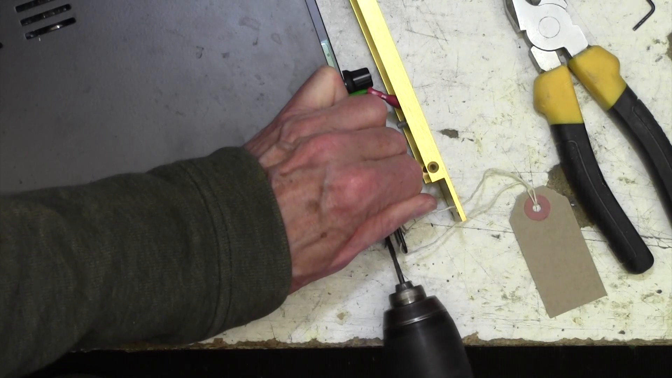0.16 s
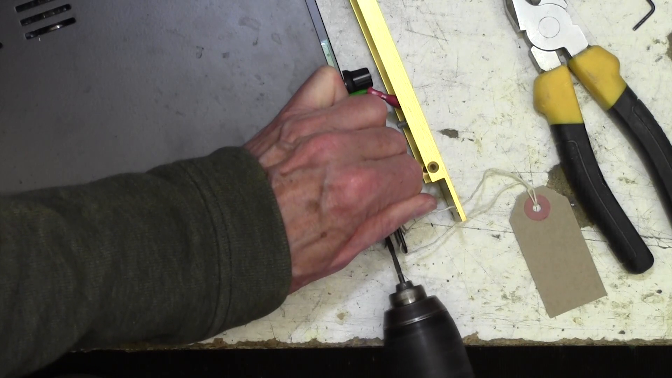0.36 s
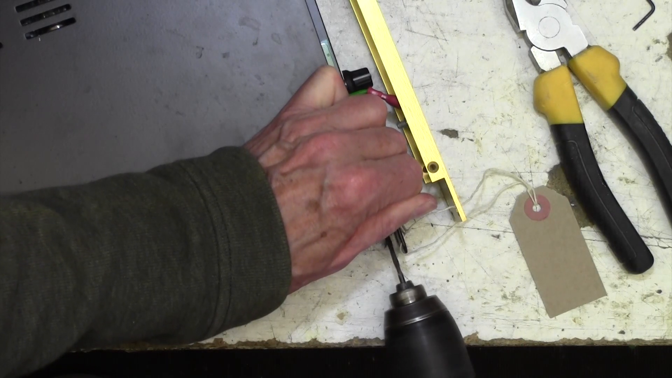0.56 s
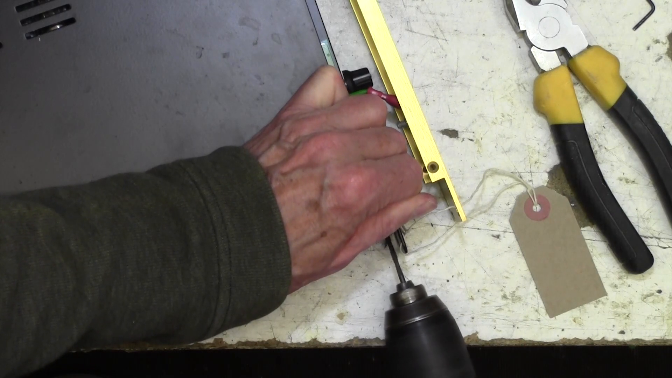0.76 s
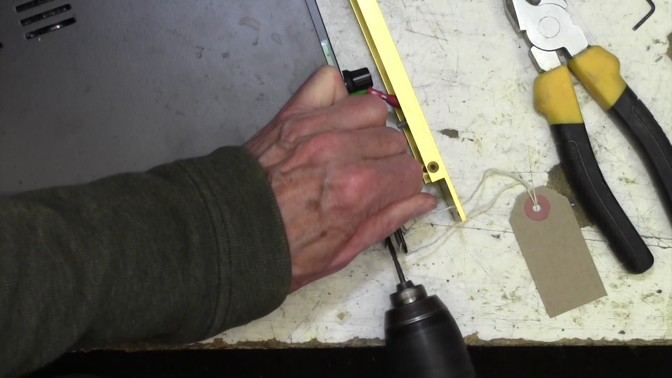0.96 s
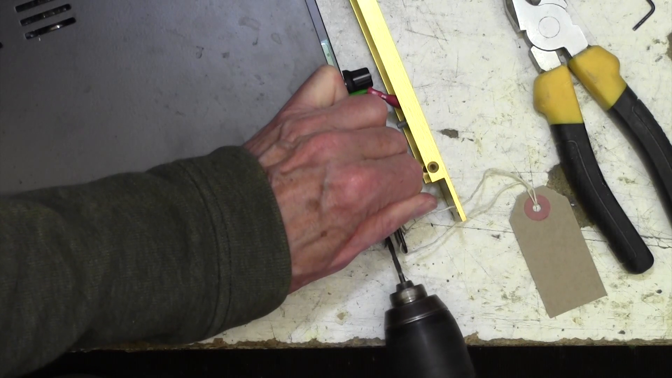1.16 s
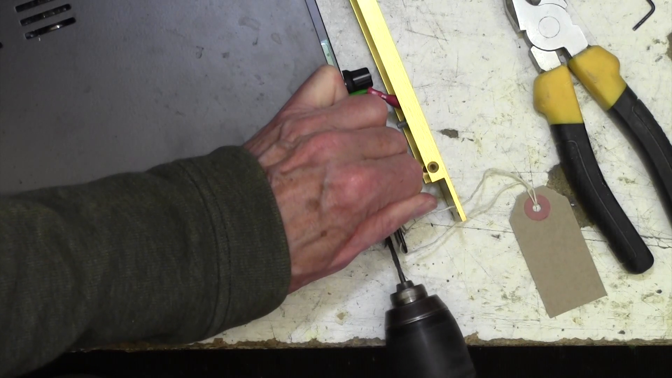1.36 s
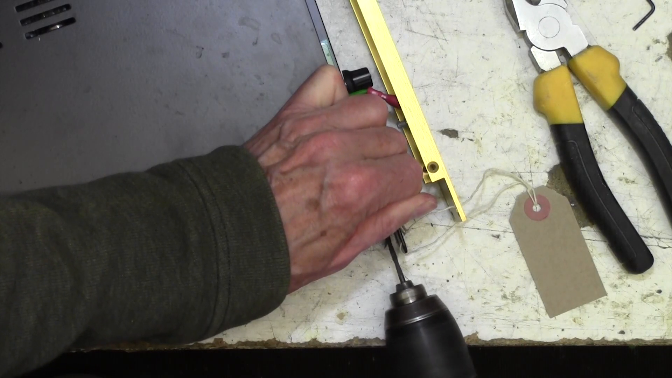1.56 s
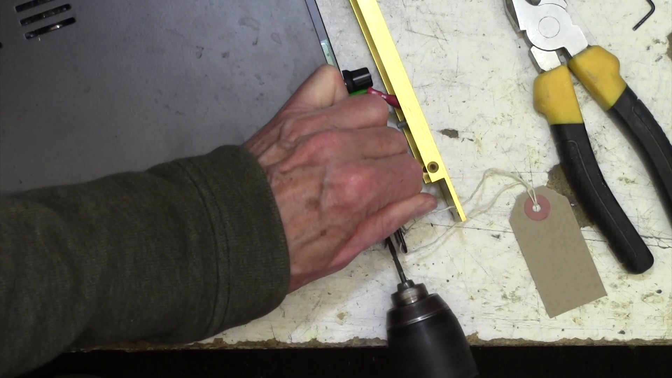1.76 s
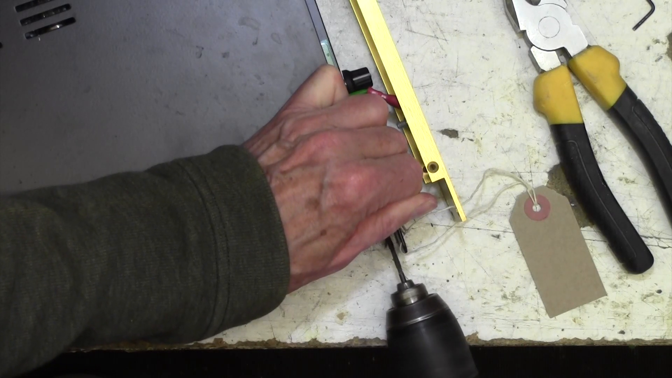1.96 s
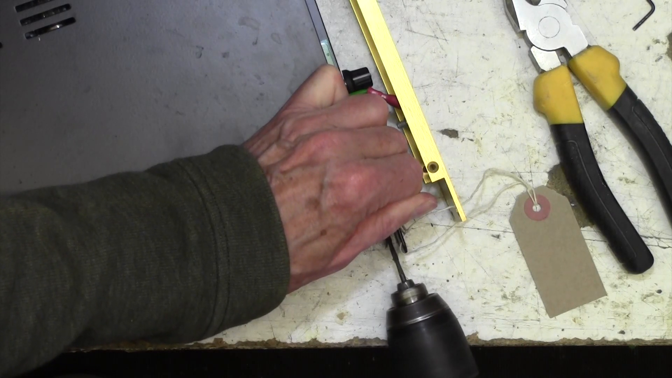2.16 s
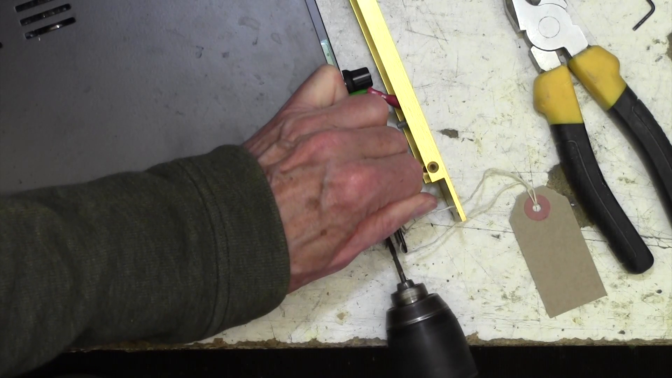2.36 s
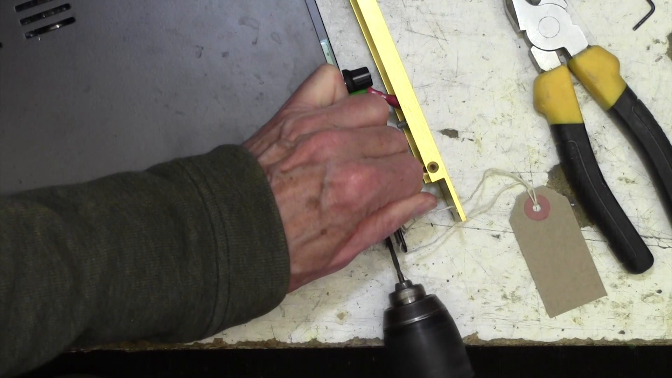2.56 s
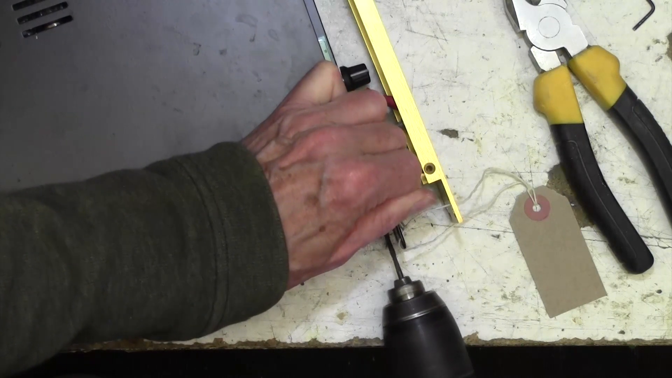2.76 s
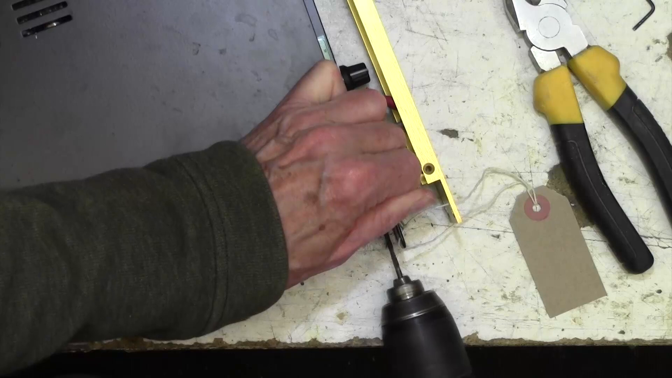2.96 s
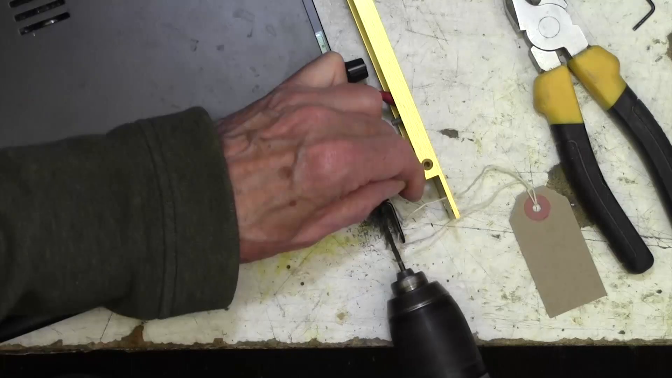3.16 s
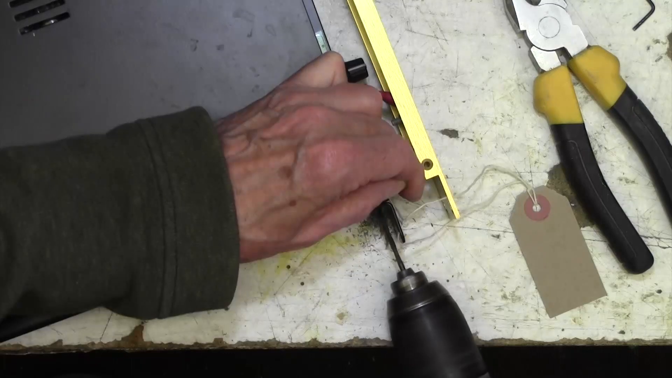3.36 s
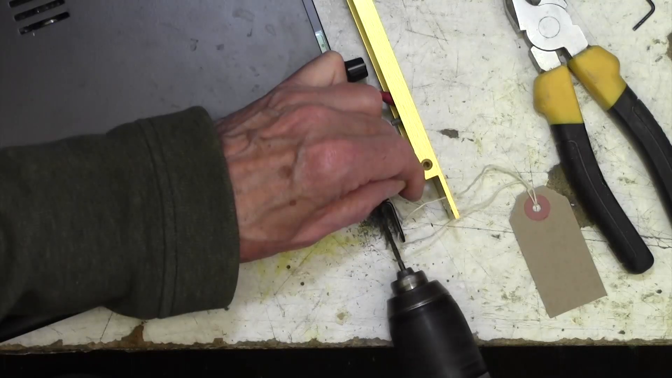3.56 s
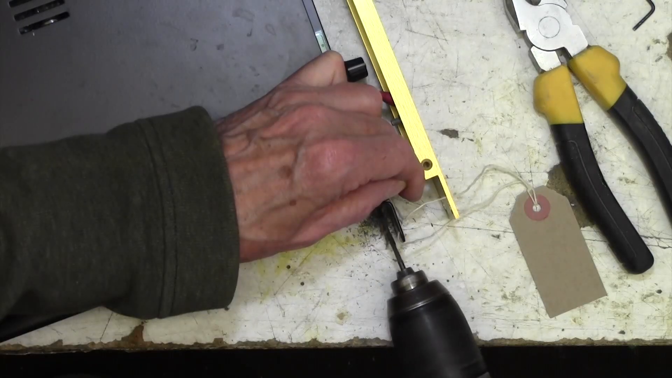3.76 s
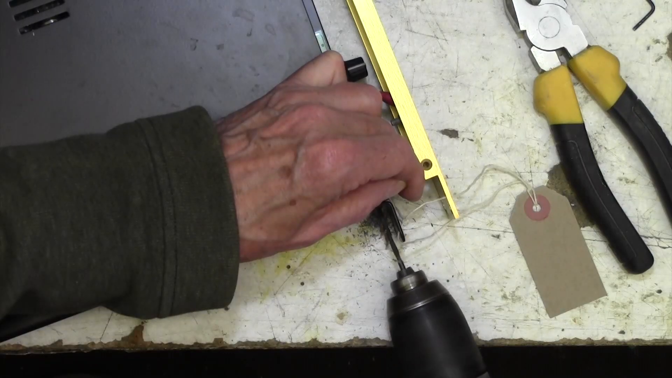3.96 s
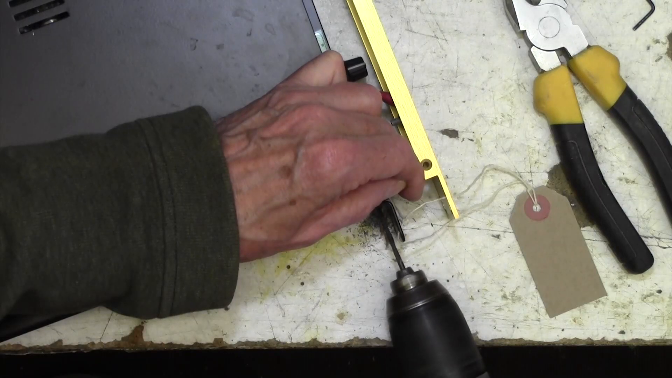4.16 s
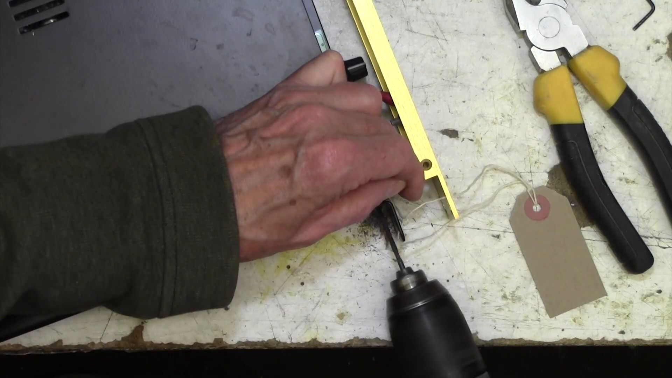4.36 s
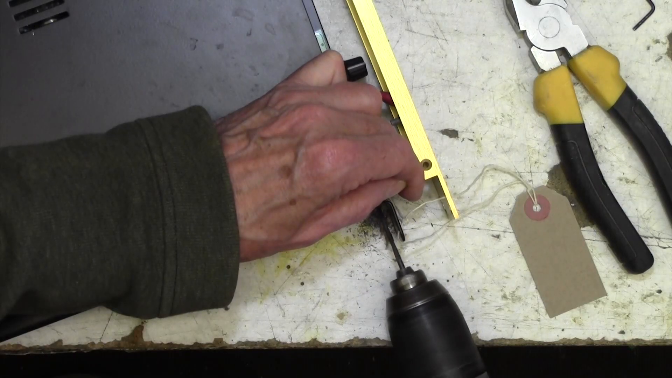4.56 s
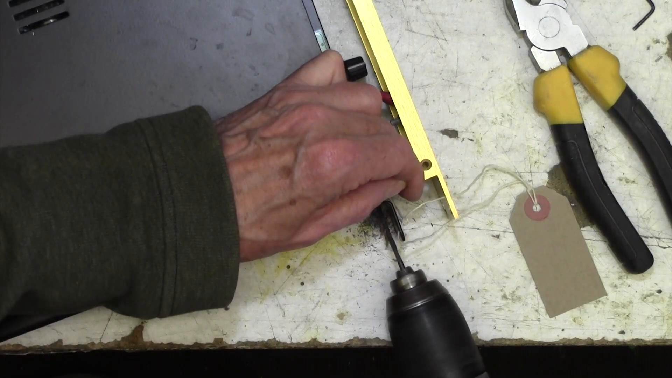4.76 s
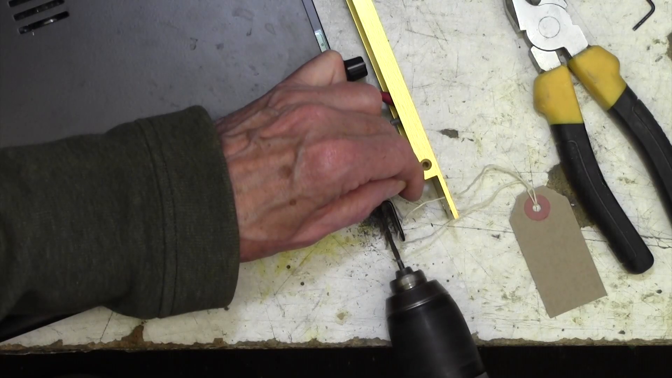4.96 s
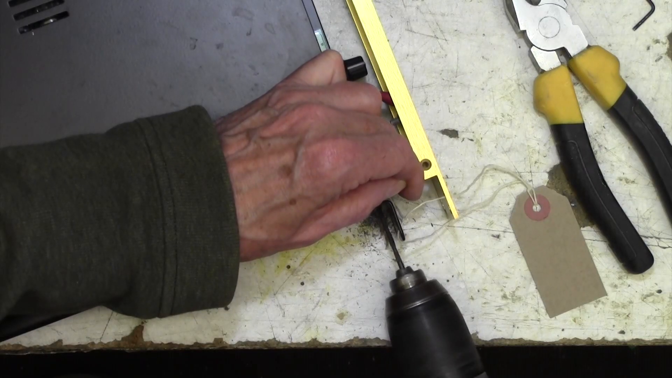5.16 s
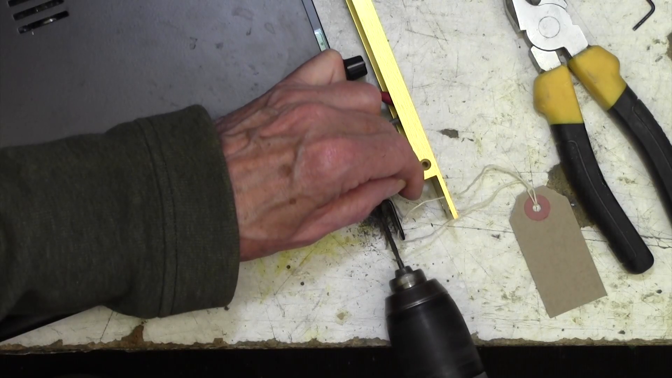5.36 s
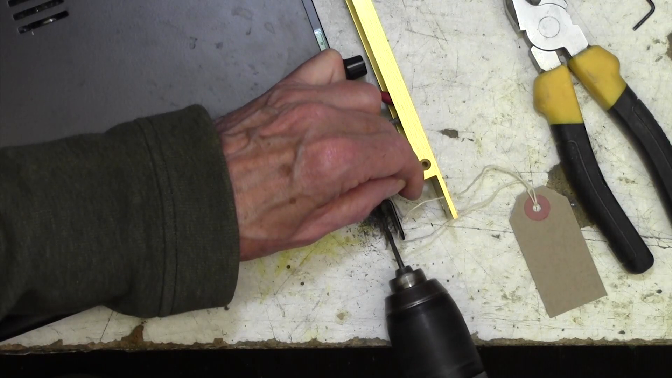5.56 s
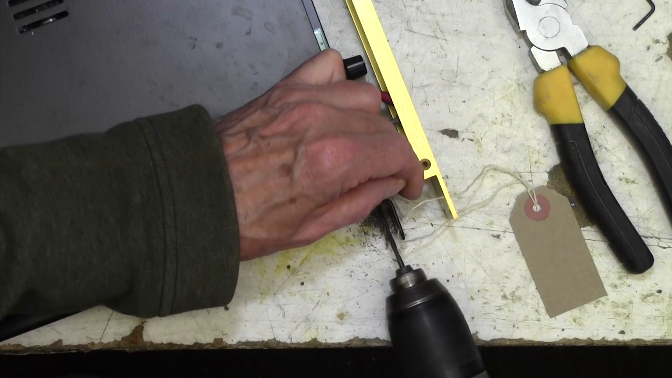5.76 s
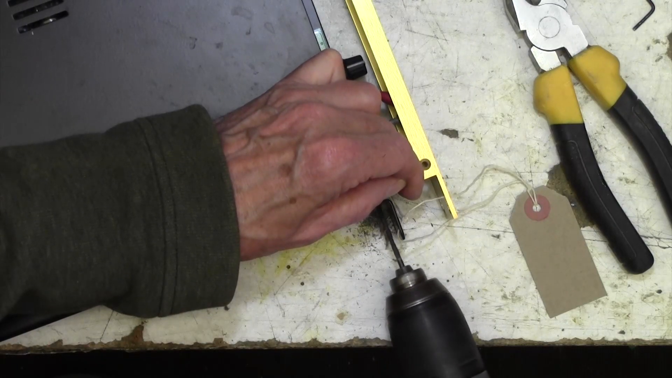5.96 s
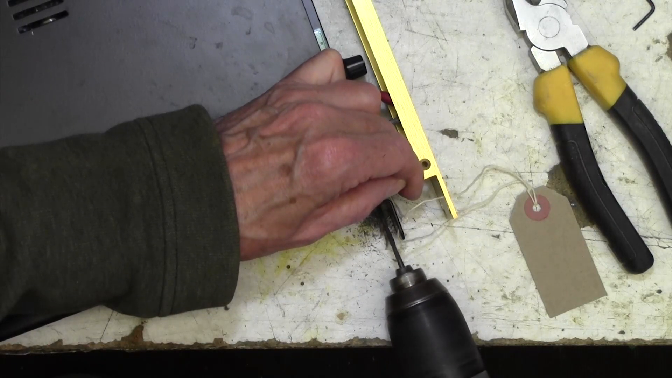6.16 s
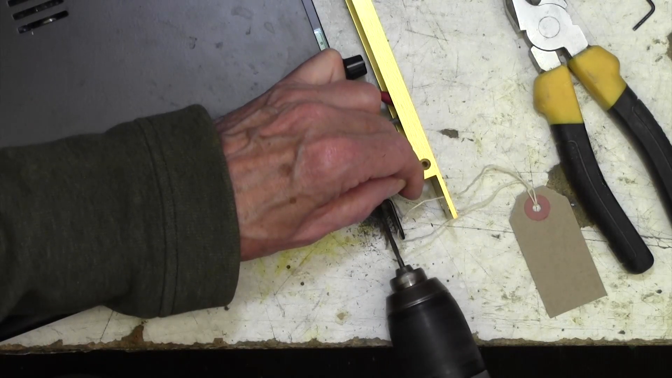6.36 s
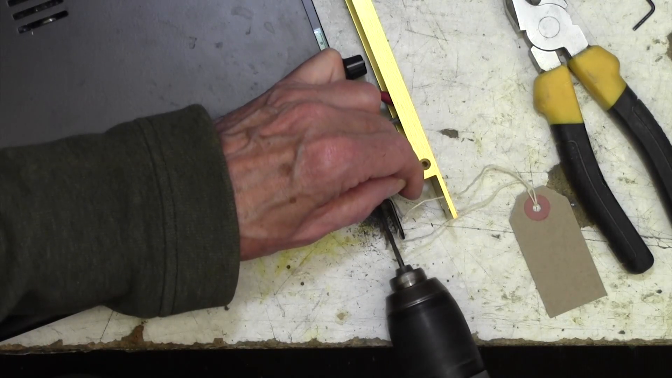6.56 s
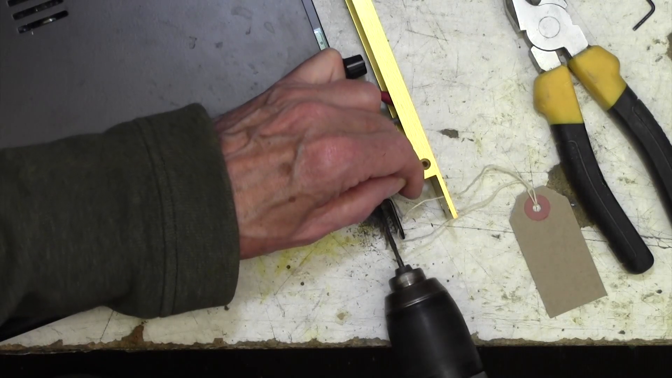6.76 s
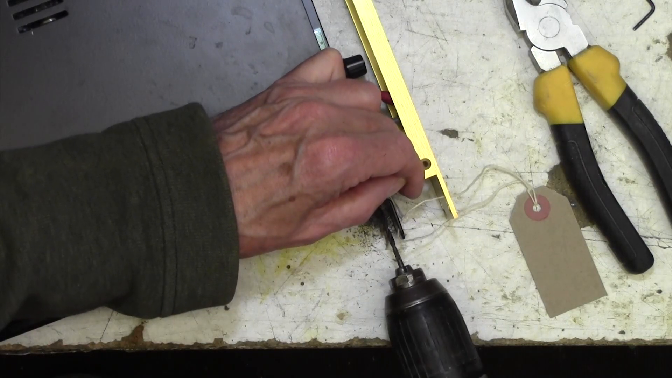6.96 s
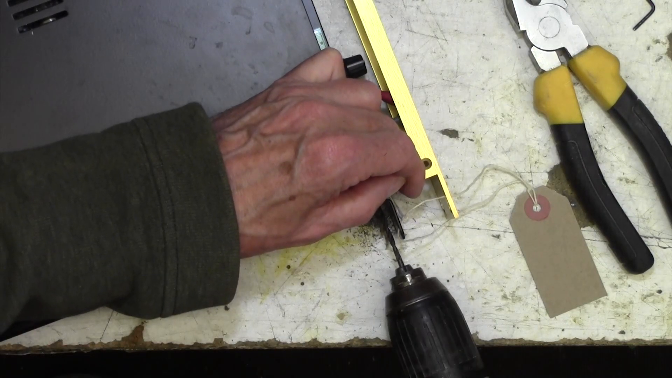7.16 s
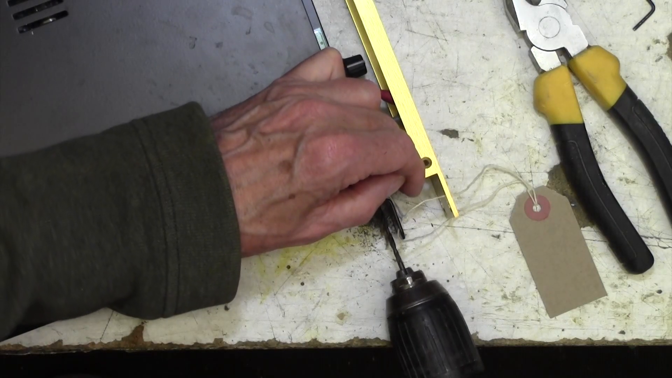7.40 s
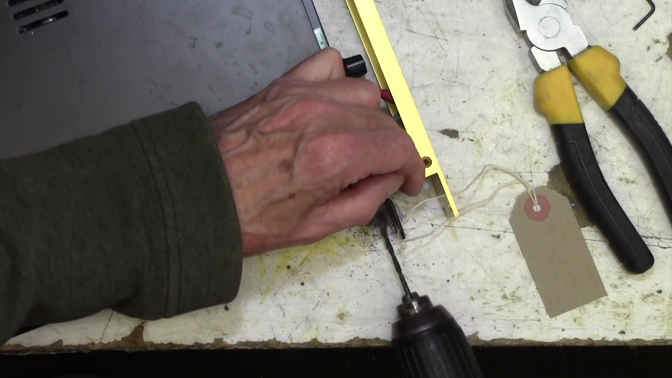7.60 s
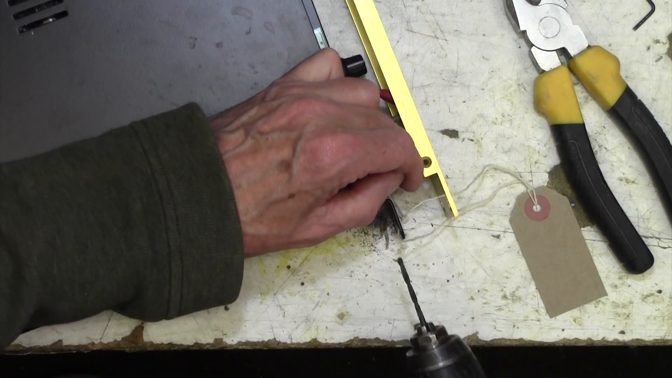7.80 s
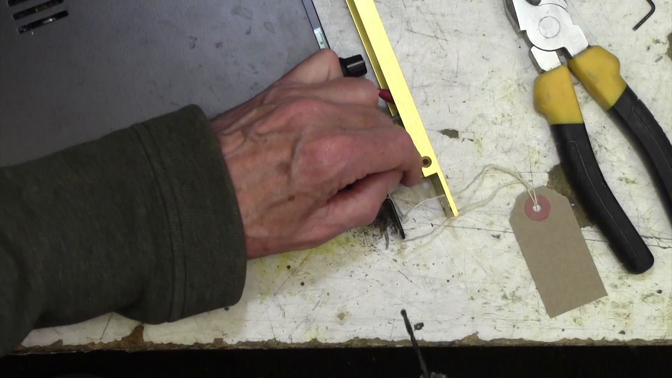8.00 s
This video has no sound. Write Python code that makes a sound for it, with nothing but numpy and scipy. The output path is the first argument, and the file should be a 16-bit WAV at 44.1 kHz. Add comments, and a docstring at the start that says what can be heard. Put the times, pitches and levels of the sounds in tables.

```python
"""At a workbench, a cordless drill bores out a stripped screw. The motor hums and its planetary gearbox whines and
rattles: tones locked to the turning carrier, over noise coloured by the casing. The bit squeals thinly (a climbing
tone), chatters in the metal for half a second (jumps that ring a panel) and is pushed harder, so the motor slows.
The trigger is let go, the brake stops the chuck with a ringing clack, and the bit is drawn out, touching and
brushing (decaying and sliding noise through resonances), over faint air noise and a mains hum."""
import sys
import numpy as np
from scipy import signal
from scipy.fft import rfft, irfft, next_fast_len
from scipy.io import wavfile

SR = 44100
rng = np.random.default_rng(int(sys.argv[2]) if len(sys.argv) > 2 else 0)


def wrap_up_sound(samples):
    """Save the sound to the file named by the first command line argument, as 16-bit audio."""
    columns = np.atleast_2d(samples).T
    # keep every value between -1 and 1, then stretch to whole-number steps
    tamed = np.clip(columns, -1, 1)
    steps = np.round(tamed * 32767).astype(np.int16)
    wavfile.write(sys.argv[1], SR, steps)


N = 354123
TIME = np.arange(N) / SR
FFT_SIZE = next_fast_len(N + 8192)
BINS_HZ = np.maximum(np.arange(FFT_SIZE // 2 + 1) * SR / FFT_SIZE, 1)
GEAR_RATIO = 7   # rotor turns per carrier turn


def from_db(db):
    """Gain of a level in dB."""
    return 10 ** (np.asarray(db) / 20)


def rms_one(x):
    """Scale to rms 1."""
    return x / np.sqrt(np.mean(x ** 2) + 1e-20)


def in_time(rows):
    """Each column of a curve at every sample."""
    s, *columns = np.transpose(rows)
    return [np.interp(TIME, s, c) for c in columns]


def in_frequency(rows):
    """Each dB column of a spectrum as a gain at every bin, interpolated over log frequency."""
    hz, *columns = np.transpose(rows)
    return [from_db(np.interp(np.log(BINS_HZ), np.log(hz), c)) for c in columns]


def colour(x, gains):
    """Filter a steady sound by a gain per bin."""
    return irfft(rfft(x, FFT_SIZE) * gains, FFT_SIZE)[..., :N]


def drift(rate_hz, size=2048):
    """Slow random curve of rms 1, changing about rate_hz times a second."""
    hz = np.arange(size + 1) * SR / N
    slow = irfft(rfft(rng.standard_normal(2 * size)) / (1 + (hz / rate_hz) ** 2))
    return np.interp(TIME, np.linspace(0, N / SR, 2 * size), rms_one(slow))


def resonate(x, modes):
    """Parallel two-pole resonances of alternating sign."""
    out = 0
    for k, (hz, width_hz, db) in enumerate(modes):
        r = np.exp(-np.pi * width_hz / SR)
        zeros = np.array([1, 0, -1]) * (1 - r * r) / 2
        poles = [1, -2 * r * np.cos(2 * np.pi * hz / SR), r * r]
        out = out + (-1) ** k * from_db(db) * signal.lfilter(zeros, poles, x + 1e-18)
    return out


def swell(start_s, length_s, attack_s, t60_s):
    """Linear attack, hold and exponential release; height 1."""
    attack = np.clip((TIME - start_s) / attack_s, 0, 1)
    return attack * from_db(-60 * np.clip((TIME - start_s - length_s) / t60_s, 0, 3))


def at_load(load, levels):
    """Blend the values for light, medium and heavy load."""
    return np.interp(load, np.arange(len(levels)), levels)


def latest(events):
    """Each column of the event that began last, at every sample."""
    rows = np.array(events)
    return rows[np.maximum(np.searchsorted(rows[:, 0], TIME, side="right") - 1, 0)].T


def gear_rattle(angle, load, repeating, knock_db, grain_db, split_hz, trim_db):
    """Teeth rub and knock, partly alike on each turn, partly at random, and sound through the casing."""
    # Each row: level in dB before trim, treble in dB relative to it; rows for light, medium, heavy load.
    rattle = [(-19.5, 1.3), (-18.5, 0), (-18, -2)]
    # Carrier multiples at which the teeth knock.
    knock_orders = [7, 13, 14, 20, 27, 34]
    level_db, treble_db = (at_load(load, column) for column in np.transpose(rattle))
    strain = (load / 2) ** 2
    seat = np.pi / 2 * strain + 0.3 * drift(0.32)   # other flanks touch as the load shifts
    pattern = np.cos(seat) * tooth_pattern(angle) + np.sin(seat) * tooth_pattern(angle)
    share = np.clip(repeating, 0, 1)
    rub = np.sqrt(share) * pattern + np.sqrt(1 - share) * rng.standard_normal(N)
    knocks = rms_one(sum(np.cos(k * angle + rng.uniform(0, 2 * np.pi)) for k in knock_orders))
    force = rub * from_db(knock_db * knocks + grain_db * drift(53))
    light, heavy = casing()
    low = 1 / (1 + (BINS_HZ / split_hz) ** 16)
    out = 0
    for band, db in ((low, level_db), (1 - low, level_db + treble_db)):
        light_part = (1 - strain) * rms_one(colour(force, light * band))
        heavy_part = strain * rms_one(colour(force, heavy * band))
        out = out + from_db(db + trim_db) * (light_part + heavy_part)
    return out


def tooth_pattern(angle, count=440, size=16384):
    """Flaws of the teeth come round again with every turn of the carrier."""
    flaws = rng.standard_normal((count, 2)) @ [1, 1j]
    one_turn = irfft(flaws, size)
    return rms_one(np.interp(angle / (2 * np.pi) % 1, np.arange(size) / size, one_turn))


def casing():
    """Gains of the casing at light and heavy load: a broad colour with narrow peaks and notches."""
    # Broad colour. Each row: frequency in Hz, dB per Hz at light load, dB per Hz at heavy load.
    broad = [(185, -30, -28), (280, -15, -13), (417, -18.5, -19), (556, -6, -6), (646, -19, -15.5),
             (778, -10.5, -13.5), (1037, -13, -11.5), (2730, -4.5, -3), (4730, -4.5, -1.5),
             (4870, -7.5, -4.5), (6850, -5, -6.5), (9270, -2.5, -5.5), (12180, -9.5, -8.5),
             (13500, -20.5, -20.5)]
    # Peaks and notches. Each row: frequency in Hz, width in Hz, gain in dB.
    narrow = [(1080, 90, -5.5), (1330, 60, -4.5), (1385, 90, 2), (1850, 54, -2.3), (2520, 140, 2.5),
              (2690, 60, 0.5), (2863, 90, 4.5), (3200, 160, -1.2), (3560, 480, -2), (4020, 300, 1.6),
              (4420, 92, -8), (4564, 88, 3.5), (4750, 47, -9.5), (5130, 90, -3), (5860, 77, -7),
              (6400, 60, 1.5), (6840, 90, -3.5), (7010, 90, -4), (7970, 55, 4), (8280, 260, -2.5),
              (9250, 97, 3.5), (9640, 89, 3), (9770, 55, 4), (10660, 300, -3.5)]
    ripple_db = sum(db * np.exp(-2 * ((BINS_HZ - hz) / width_hz) ** 2) for hz, width_hz, db in narrow)
    return [gains * from_db(ripple_db) for gains in in_frequency(broad)]


def gear_tones(angle, load, waver_db, slip_rad):
    """Tooth-mesh tones and their sidebands, all locked to the carrier; each wavers as the planets shift."""
    # Gear and bearing tones. Each row: multiple of the carrier's rate, dB at light, medium and heavy load.
    tones = [(1, -56, -55, -52), (7, -38, -43, -42), (14, -45, -46, -39), (22, -48, -46, -42),
             (48, -42, -49, -48), (52.8, -40, -57, -48), (61, -38, -47, -52), (63.8, -45, -43, -37),
             (66, -50, -55, -36), (68, -48, -33, -47), (75, -34, -36, -31), (81, -39, -35, -37),
             (83.2, -56, -47, -38), (88, -32, -33, -35), (91, -49, -49, -37), (95, -44, -34, -42),
             (102, -47, -53, -44), (108, -46, -49, -40), (109, -39, -51, -36), (112, -46, -54, -40),
             (116, -40, -38, -41), (119, -47, -39, -43), (122, -40, -44, -31), (132, -43, -42, -39),
             (133, -42, -44, -47), (147, -45, -34, -43), (163, -42, -48, -50), (168, -41, -47, -42),
             (176, -36, -34, -38), (177, -56, -44, -40), (182, -43, -39, -43), (189, -40, -44, -45),
             (196, -35, -39, -37), (197, -38, -40, -42), (203, -48, -43, -41), (204, -36, -39, -43),
             (210, -47, -44, -42), (211, -35, -46, -41), (224, -40, -39, -36), (238, -36, -38, -43),
             (252, -39, -34, -41), (256, -36, -33, -37), (258, -37, -41, -40), (259, -39, -38, -36),
             (265, -35, -35, -34), (266, -41, -40, -39), (279, -34, -36, -34), (294, -46, -48, -44),
             (299, -42, -44, -50), (306, -40, -44, -44), (313, -46, -43, -43), (343, -45, -45, -39)]
    out = 0
    for multiple, *levels_db in tones:
        loose = np.tanh(multiple / 50)   # the low rotor hum is nearly steady
        phase = multiple * angle + rng.uniform(0, 2 * np.pi) + slip_rad * loose * drift(2.5)
        level_db = at_load(load, levels_db) + waver_db * loose * drift(4.8)
        out = out + from_db(level_db) * np.sin(phase)
    return np.sqrt(2) * out


def motor_whines(angle, load, wander_db, flutter_db, trim_db):
    """High orders of the rotor follow the load, wander a little and now and then swell."""
    # Each row: order of the rotor, dB before trim at light, medium and heavy load.
    whines = [(7, -35.5, -37, -34), (14, -31, -28.5, -30.5), (33, -37, -42, -36), (35, -33.5, -36.5, -34)]
    # Each row: start in seconds, length in seconds, order of the rotor, gain in dB.
    swells = [(0, 1.27, 35, 9), (2.72, .25, 35, 10), (3.1, .42, 7, 3.5), (4.8, 2.1, 33, 6)]
    attack_s, t60_s = .06, .5
    out = 0
    for order, *levels_db in whines:
        lift = sum((from_db(db) - 1) * swell(s, length_s, attack_s, t60_s)
                   for s, length_s, k, db in swells if k == order)
        level_db = at_load(load, levels_db) + wander_db * drift(1.3) + flutter_db * drift(23)
        out = out + from_db(level_db) * (1 + lift) * np.sin(order * GEAR_RATIO * angle)
    return np.sqrt(2) * from_db(trim_db) * out


def squeal(waver_hz, flutter_db, trim_db):
    """The cutting edge sticks and slips at a climbing pitch; its rubbing rings the bit."""
    # Each row: start in seconds, length in seconds, first and last pitch in Hz, mid-pitch dB before trim.
    squeals = [(0, .2, 5725, 5770, -31), (.24, 1.13, 5520, 5780, -31.5), (1.51, .1, 5700, 5720, -35),
               (1.76, .85, 5520, 5790, -31.5), (2.66, .41, 5630, 5835, -29),
               (3.08, 3.85, 5930, 5950, -35.5)]
    # High modes of the bit. Each row: frequency in Hz, width in Hz, gain in dB.
    bit_modes = [(8030, 140, 1.5), (8890, 110, 6), (9030, 190, 5)]
    # The rubbed bit rings. Each row: start in seconds, length in seconds, level in dB.
    sings = [(0, 1.76, -27), (2.65, 0.22, -26), (6.876, .04, -24)]
    climb_exponent = .75   # under 1: climbs fast at first, then levels off
    growth_db_per_hz = 0.01   # louder as the pitch climbs
    attack_s, t60_s = 0.024, .15
    sing_attack_s, sing_t60_s, sing_floor_db = 0.014, 0.4, -44.5

    start_s, length_s, first_hz, last_hz, level_db = latest(squeals)
    climb = np.clip((TIME - start_s) / length_s, 0, 1) ** climb_exponent
    hz = first_hz + (last_hz - first_hz) * climb
    tone = np.sqrt(2) * np.sin(2 * np.pi * np.cumsum(hz + waver_hz * drift(46)) / SR)
    growth_db = growth_db_per_hz * (hz - (first_hz + last_hz) / 2)
    bite_db = level_db + growth_db + trim_db + flutter_db * drift(25)
    bite = swell(start_s, length_s, attack_s, t60_s) * from_db(bite_db)
    ring = rms_one(resonate(rng.standard_normal(N), bit_modes))
    rubbing = from_db(sing_floor_db) + sum(from_db(db) * swell(s, held_s, sing_attack_s, sing_t60_s)
                                           for s, held_s, db in sings)
    return bite * tone + rubbing * ring


def chatter(jitter, uneven_db, scrape_db, bench_hz, bench_width_hz):
    """The bit catches and jumps in bursts, which knock the panel, while the bench shakes throughout."""
    # Each row: start in seconds, length in seconds, level in dB, jumps per second.
    bursts = [(1.966, 0.043, -20, 450), (2.057, .014, -23.5, 360), (2.111, 0.038, -18.5, 454),
              (2.181, .014, -23, 330), (2.223, 0.033, -19, 432), (2.294, .014, -19.5, 356),
              (2.35, 0.038, -20.5, 441), (2.407, .02, -28.5, 440), (2.478, .016, -26.5, 390)]
    # The panel that holds the screw. Each row: frequency in Hz, width in Hz, gain in dB.
    panel = [(115, 51, -9), (320, 100, 2.5), (440, 136, 1), (860, 92, -0.5), (1005, 83, -1), (1310, 120, 0),
             (1760, 130, -4), (2160, 200, -3), (2640, 400, -5)]
    attack_s, t60_s = 0.0082, 0.13
    judder_db, judder_t60_s = -30.5, .45   # goes on between the bursts
    shake_db, shake_t60_s = -40, 0.45

    begin_s = bursts[0][0]
    span_s = bursts[-1][0] + bursts[-1][1] - begin_s
    burst_level = np.max([from_db(db) * swell(s, length_s, attack_s, t60_s)
                          for s, length_s, db, _ in bursts], axis=0)
    judder = from_db(judder_db) * swell(begin_s, span_s, attack_s, judder_t60_s)
    level = np.hypot(burst_level, judder)
    shake = from_db(shake_db) * swell(begin_s, span_s, attack_s, shake_t60_s)
    jumps_per_s = latest(bursts)[-1] * (1 + jitter * drift(120))
    jumps = np.diff(np.floor(np.cumsum(jumps_per_s) / SR), prepend=0)
    force = rms_one(jumps * from_db(uneven_db * drift(200)))
    force = force + from_db(scrape_db) * rng.standard_normal(N)
    bench = np.sin(2 * np.pi * np.cumsum(bench_hz + bench_width_hz * drift(25)) / SR)
    bench = bench * from_db(3.0 * drift(20))
    return level * rms_one(resonate(force, panel)) + shake * rms_one(bench)


def contacts(events, modes):
    """Each contact is a dying rattle that rings the modes of a part."""
    power = sum((TIME >= s) * from_db(db - 60 * np.maximum(TIME - s, 0) / t60_s) ** 2
                for s, db, t60_s in events)
    grit = rng.standard_normal(N)
    return resonate(grit * np.sqrt(power), modes) / np.std(resonate(grit, modes))


def chuck_clacks():
    """The chuck clacks as it is braked, ringing chuck and gear case."""
    # Each row: start in seconds, level in dB, 60 dB decay in seconds.
    clacks = [(6.933, -13.5, 0.11), (6.951, -8.5, 0.027), (6.963, -18.5, 0.18), (6.983, -21.5, 0.18),
              (7.003, -23.5, 0.18), (7.045, -34, 0.32), (7.154, -48, .1)]
    # Chuck and gear case. Each row: frequency in Hz, width in Hz, gain in dB.
    chuck = [(318, 90, -9), (540, 78, -1.5), (850, 230, -7), (1250, 320, -5), (2300, 240, 1.5),
             (2550, 130, 1), (2700, 210, -1), (4020, 910, -13)]
    return contacts(clacks, chuck)


def bit_touches():
    """The bit touches the screw on its way out, ringing bit and panel."""
    # Each row: start in seconds, level in dB, 60 dB decay in seconds.
    touches = [(7.288, -52, .07), (7.306, -49, .08), (7.528, -48, .1), (7.537, -40.5, 0.097)]
    # Drill bit and panel. Each row: frequency in Hz, width in Hz, gain in dB.
    bit = [(496, 500, -7), (1520, 1200, -5), (3470, 200, 1), (4000, 300, -1), (8600, 950, -9),
           (9900, 1300, -9)]
    return contacts(touches, bit)


def brushes():
    """The bit brushes the panel as it is drawn away: light sliding contact rings one mode of the bit."""
    # Each row: start in seconds, length in seconds, level in dB.
    strokes = [(7.81, .025, -67), (7.865, .05, -64), (7.945, .04, -65)]
    mode_hz, width_hz, attack_s, t60_s = 4090, 400, .015, .12
    level = sum(from_db(db) * swell(s, length_s, attack_s, t60_s) for s, length_s, db in strokes)
    return level * rms_one(resonate(rng.standard_normal(N), [(mode_hz, width_hz, 0)]))


def workshop(air_db, diffuse_db):
    """Still air, a little different on left and right, and a mains hum."""
    # Air with a faint hollow ring. Each row: frequency in Hz, dB per Hz.
    air_colour = [(25, -9), (40, -5.5), (75, -8), (110, -16), (200, -17), (400, -16.5), (900, -22),
                  (1230, -26), (1370, -21), (1550, -28), (2000, -29.5), (4200, -28), (5500, -33),
                  (15000, -42)]
    # Mains hum. Each row: time in seconds, level in dB.
    hum_level = [(0, -66), (4, -62), (6.9, -57), (7.2, -60), (7.5, -56), (7.62, -49.5), (8.03, -47.5)]
    mains_hz = 59.3
    air, left, right = rms_one(colour(rng.standard_normal((3, N)), in_frequency(air_colour)[0]))
    hum = np.sqrt(2) * np.sin(2 * np.pi * mains_hz * TIME)
    stereo_air = air + from_db(diffuse_db) * np.array([left, right])
    return from_db(air_db) * stereo_air + from_db(in_time(hum_level)[0]) * hum


def stereo(x, background, t60_s, size=8192):
    """A random echo, added to left and taken from right, widens bass and treble; the middle stays almost mono."""
    # Each row: frequency in Hz, level of the left-right difference in dB.
    difference = [(40, -4), (150, -7), (240, -19.5), (500, -18), (1300, -47), (2800, -62), (5500, -19.5),
                  (9500, -26), (14000, -13)]
    # Each row: frequency in Hz, left over right in dB.
    balance_db = [(60, 2.6), (180, 1.7), (350, 1.2), (700, .3), (1400, 0), (4000, 0), (6500, -.3),
                  (9000, -1.7)]
    width, balance = in_frequency(difference)[0], in_frequency(balance_db)[0]
    echoes = rng.standard_normal(size) * from_db(-60 * TIME[:size] / t60_s)
    side = colour(x, width * rfft(echoes / np.linalg.norm(echoes), FFT_SIZE))
    return colour(np.array([x + side, x - side]) + background, np.sqrt([balance, 1 / balance]))


def scene():
    """One carrier angle drives motor and gears; the brake slows them and fades the drill, squeal included."""
    # Motor under the trigger, before the brake. Each row: time in seconds, turns per second.
    motor_speed = [(0, 259.3), (0.5, 258.1), (1.25, 258.4), (1.7, 257.6), (2.15, 254.7), (2.6, 254.9),
                   (3.06, 253.2), (3.09, 248.7), (3.55, 247.1), (3.95, 246.6), (4.4, 246.9), (4.85, 245.7),
                   (5.9, 245.1), (6.25, 245.7), (6.9, 245.4)]
    # Push on the drill. Each row: time in seconds, load (0 light, 1 medium, 2 heavy).
    push = [(0, 0), (1.68, 0), (1.82, 1), (3.05, 1), (3.09, 1.9), (4.6, 1.9), (4.9, 2), (6.9, 2)]
    # brake: speed and level in dB fall at steady rates
    brake_s, run_down_s, brake_db_per_s = 6.95, .22, 203
    braked_s = np.maximum(TIME - brake_s, 0)
    turns_per_s = in_time(motor_speed)[0] * np.maximum(1 - braked_s / run_down_s, 0)
    angle = 2 * np.pi * np.cumsum(turns_per_s) / SR / GEAR_RATIO
    load = in_time(push)[0]

    drill = gear_rattle(angle, load, repeating=0.16, knock_db=0.3, grain_db=0.74, split_hz=6800, trim_db=-1.61)
    drill = drill + gear_tones(angle, load, waver_db=2.5, slip_rad=.25)
    drill = drill + motor_whines(angle, load, wander_db=1.1, flutter_db=0.5, trim_db=-0.14)
    drill = drill + squeal(waver_hz=14.1, flutter_db=2.0, trim_db=0.6)
    drill = drill * from_db(-brake_db_per_s * braked_s)
    cutting = chatter(jitter=.07, uneven_db=5.5, scrape_db=0.5, bench_hz=59.4, bench_width_hz=5)
    stop = chuck_clacks() + bit_touches() + brushes()
    return stereo(drill + cutting + stop, workshop(air_db=-52.0, diffuse_db=-7), t60_s=0.32)


def record(dry):
    """The top is cut steeply."""
    cutoff_hz = 16100
    return colour(dry, 1 / np.sqrt(1 + (BINS_HZ / cutoff_hz) ** 300))


dry = scene()
out = record(dry)
wrap_up_sound(out)
```